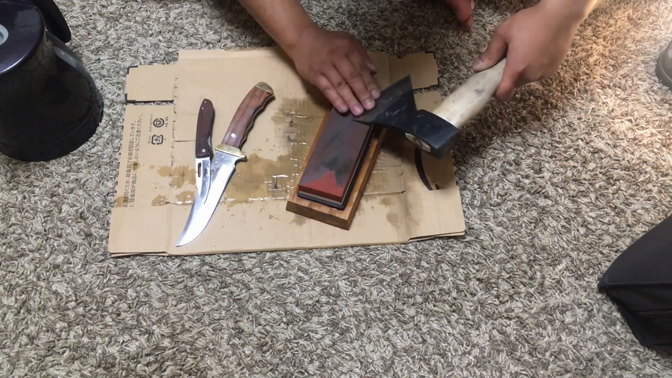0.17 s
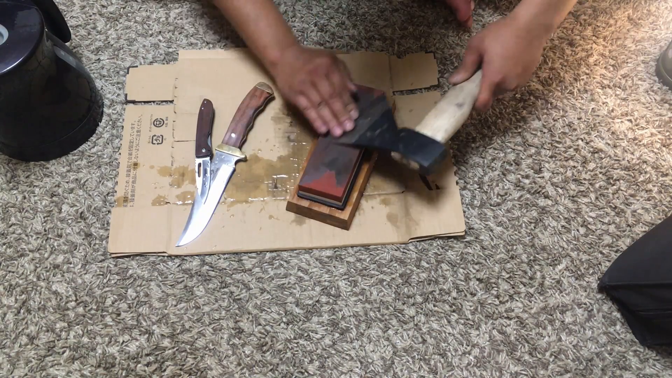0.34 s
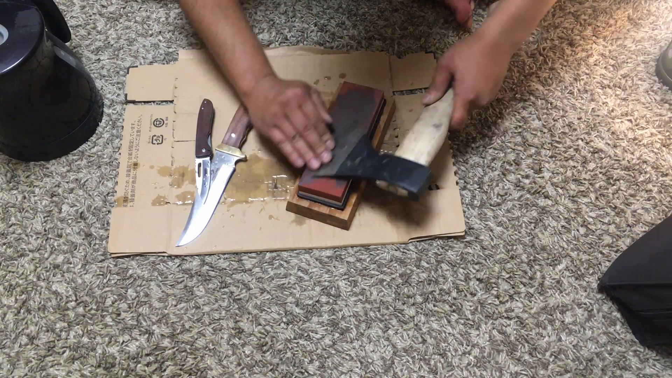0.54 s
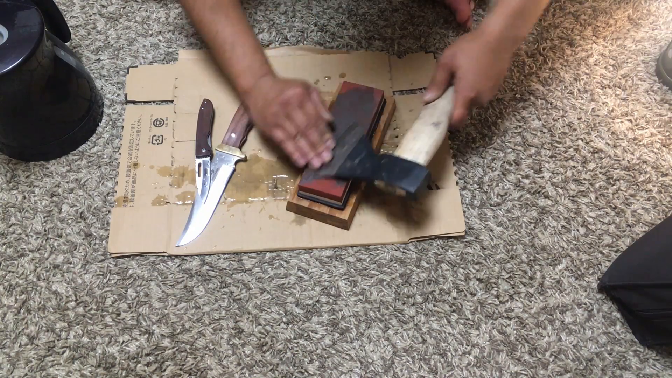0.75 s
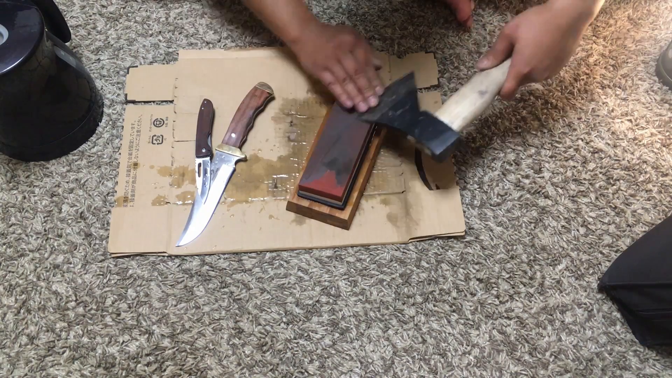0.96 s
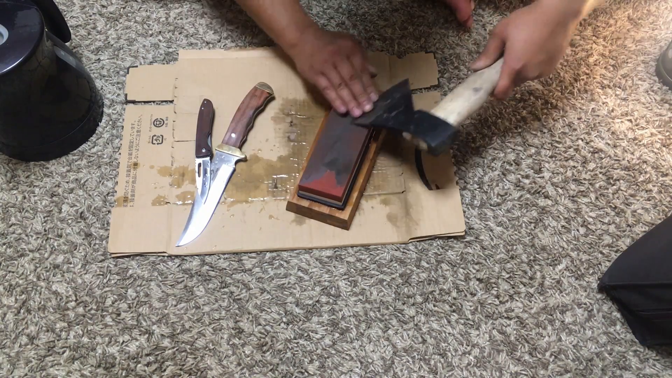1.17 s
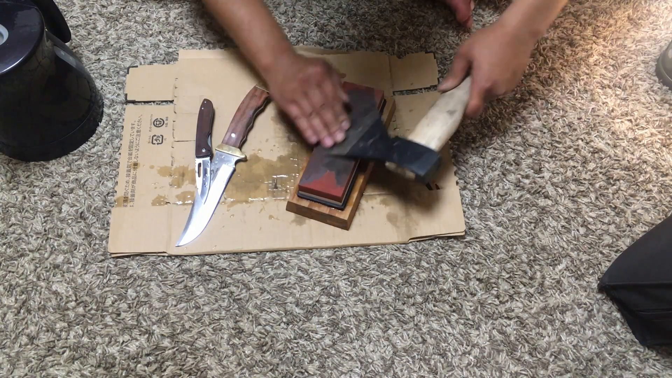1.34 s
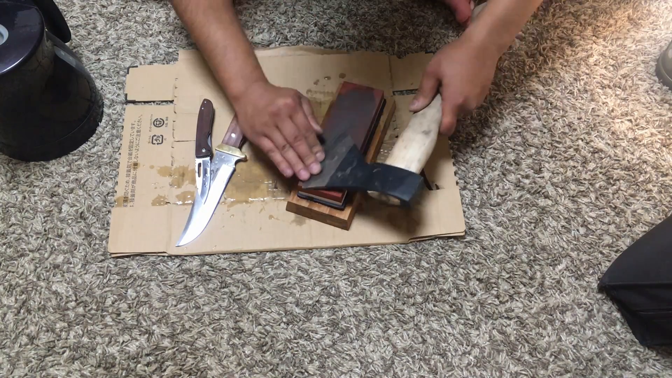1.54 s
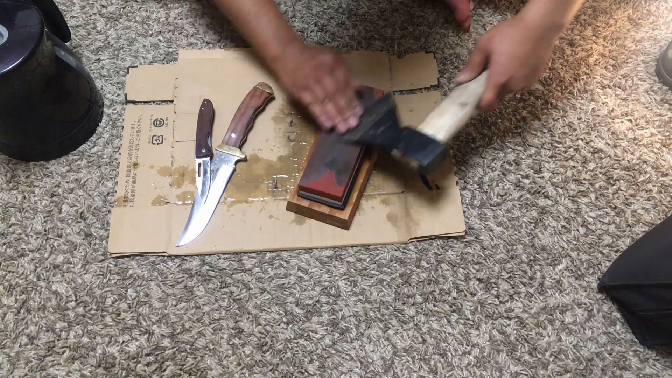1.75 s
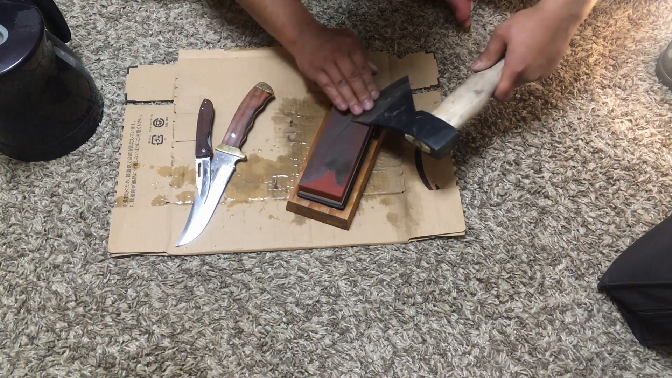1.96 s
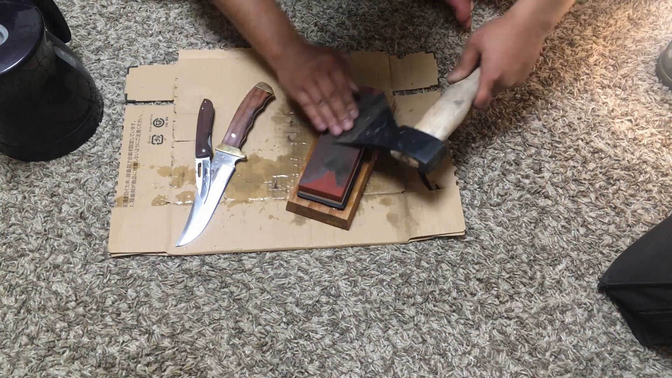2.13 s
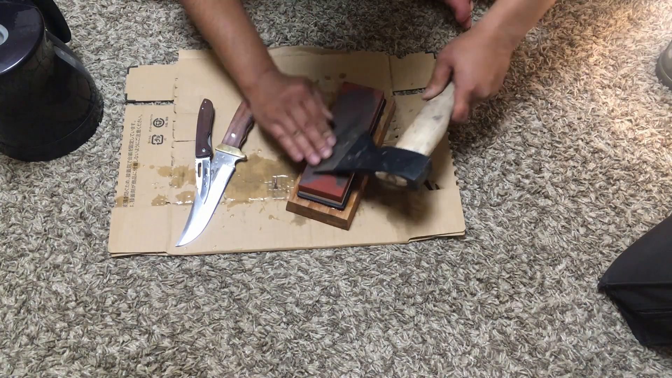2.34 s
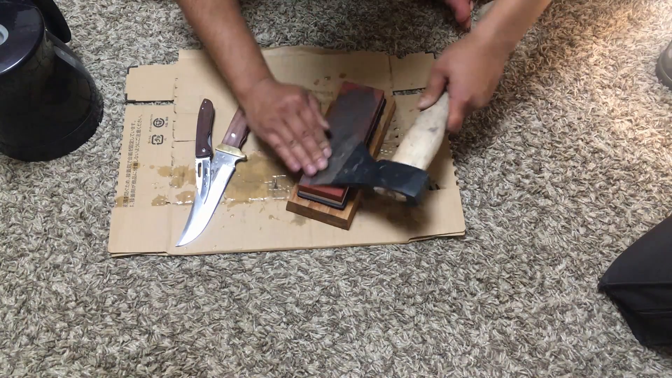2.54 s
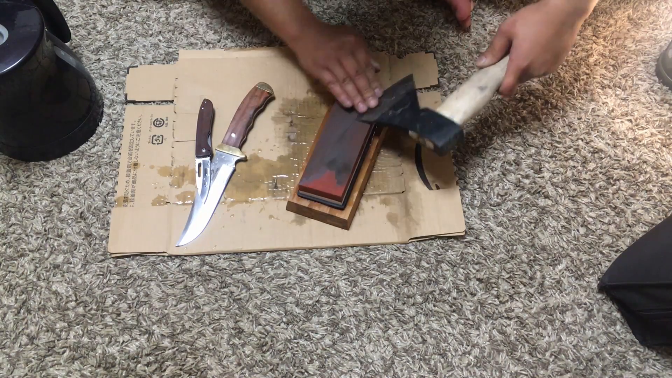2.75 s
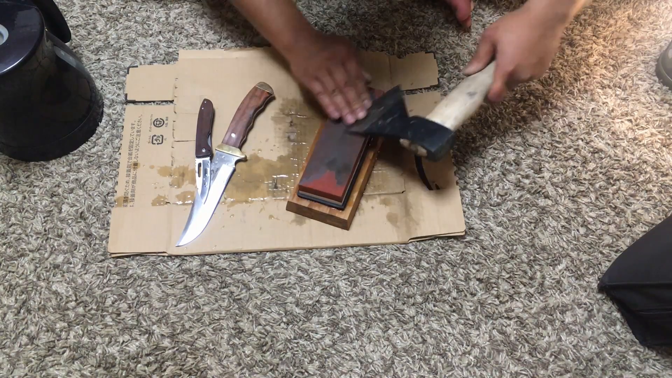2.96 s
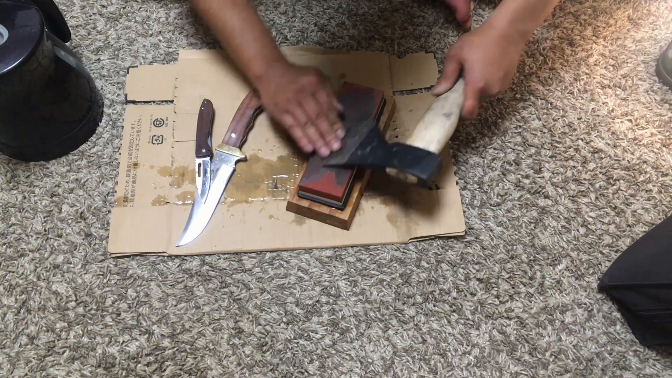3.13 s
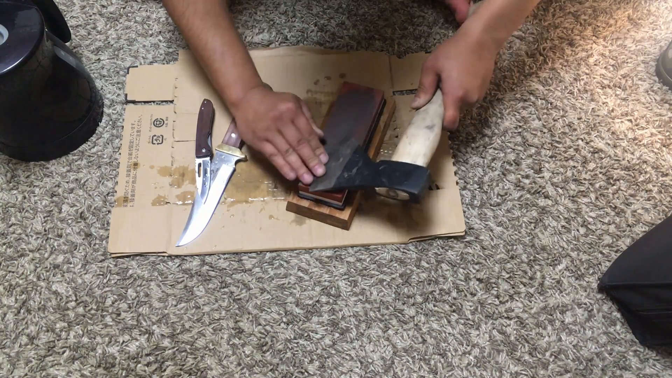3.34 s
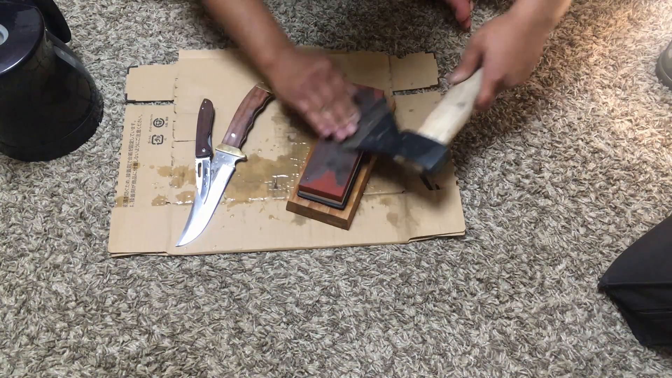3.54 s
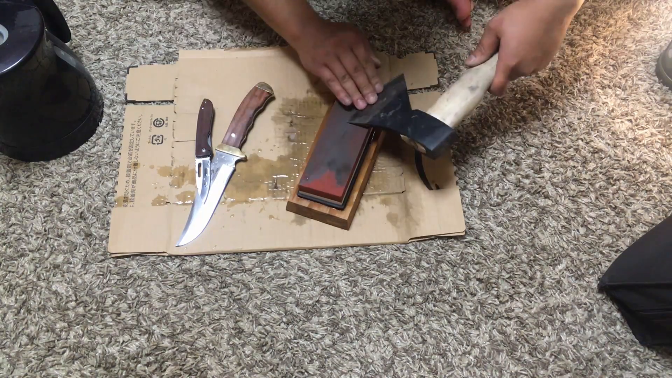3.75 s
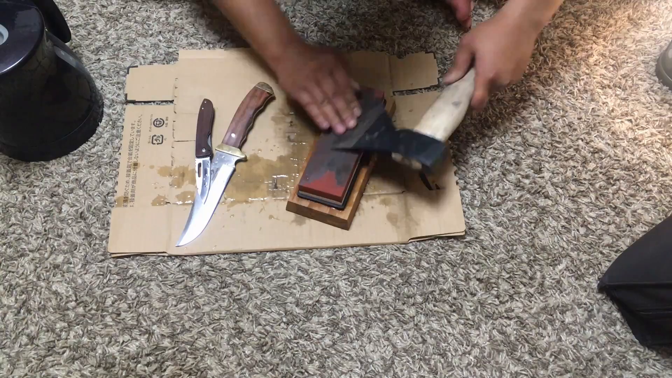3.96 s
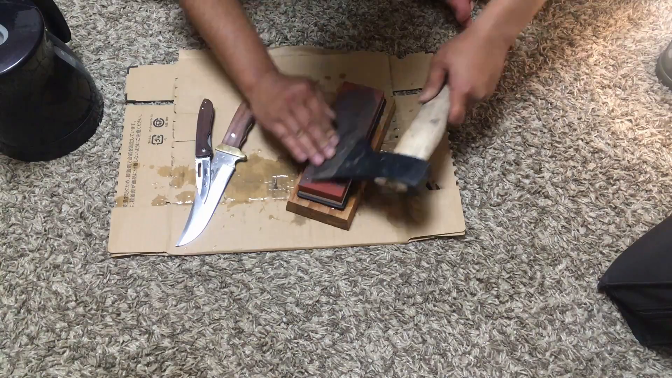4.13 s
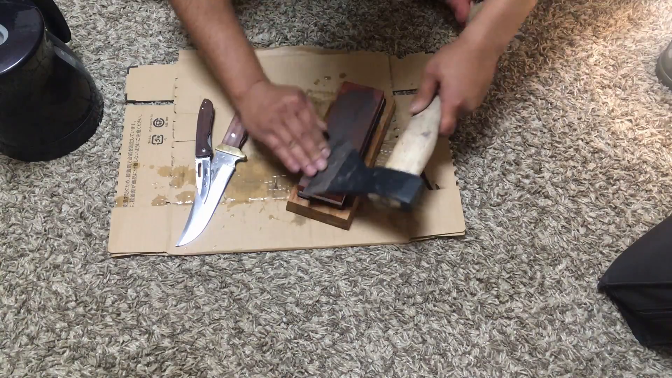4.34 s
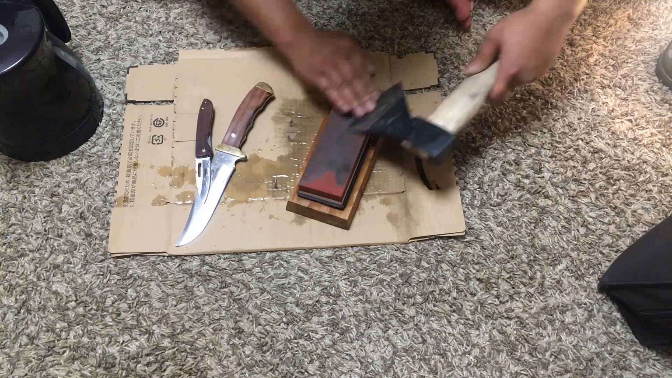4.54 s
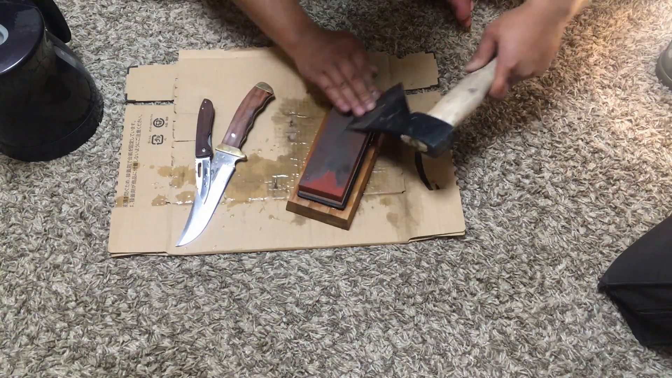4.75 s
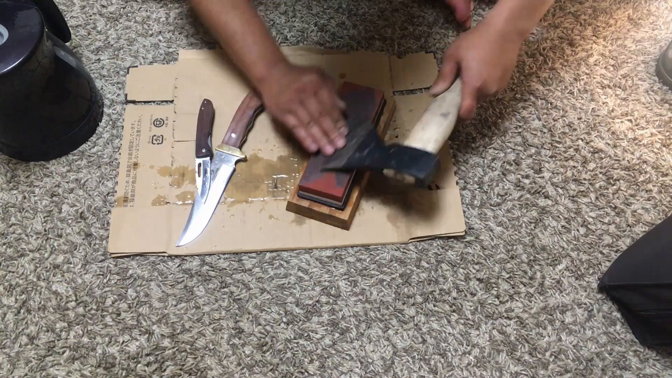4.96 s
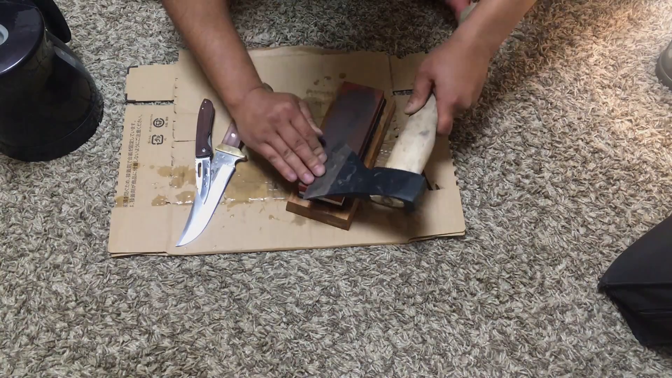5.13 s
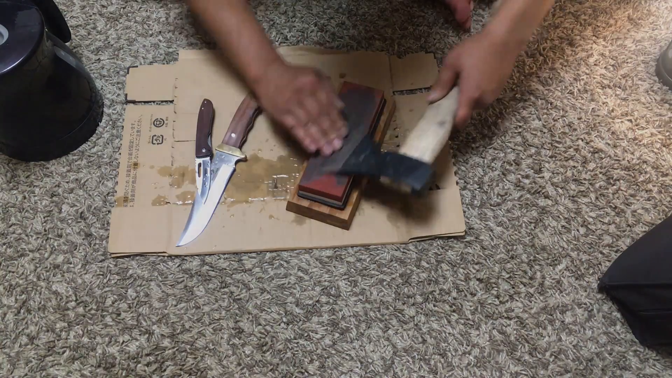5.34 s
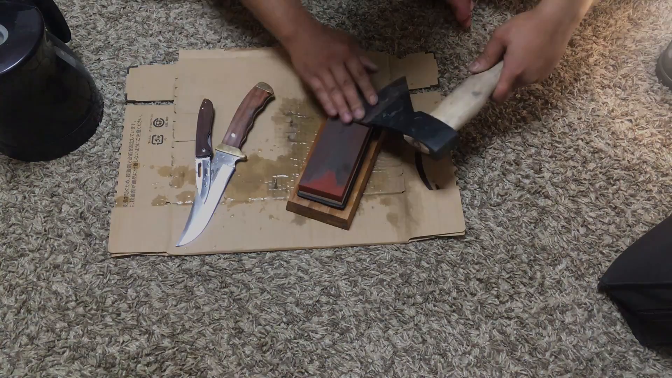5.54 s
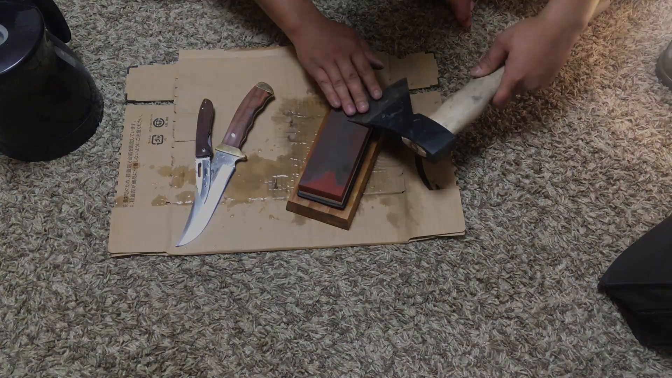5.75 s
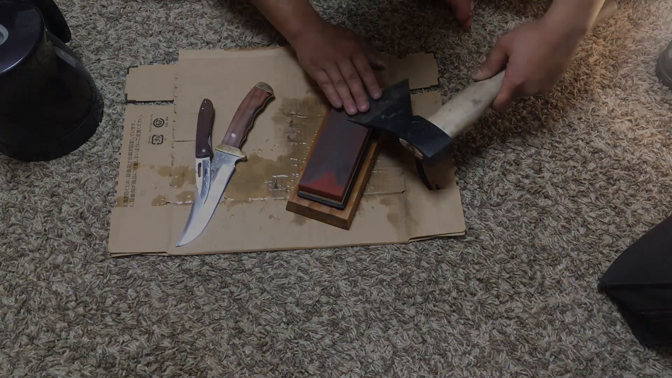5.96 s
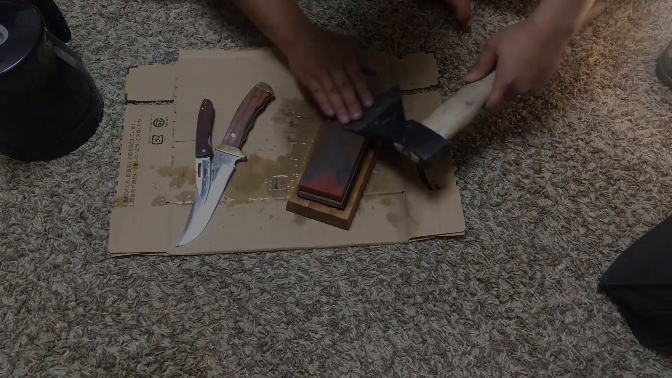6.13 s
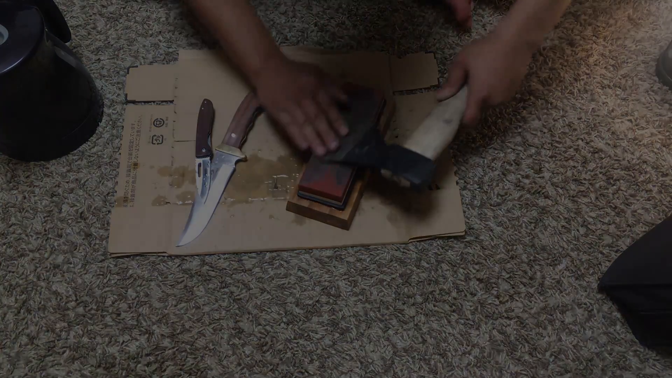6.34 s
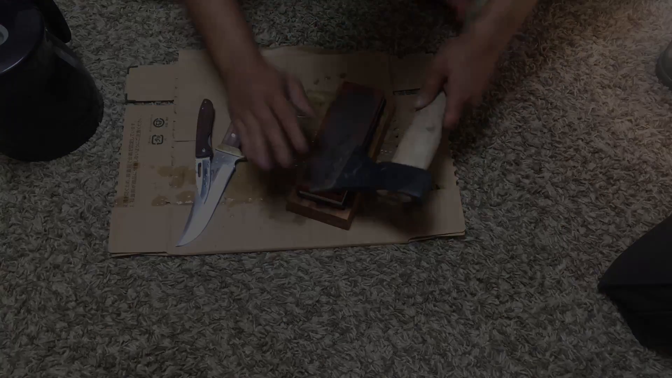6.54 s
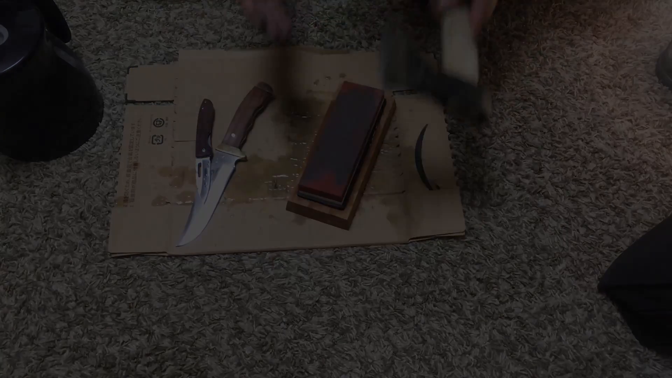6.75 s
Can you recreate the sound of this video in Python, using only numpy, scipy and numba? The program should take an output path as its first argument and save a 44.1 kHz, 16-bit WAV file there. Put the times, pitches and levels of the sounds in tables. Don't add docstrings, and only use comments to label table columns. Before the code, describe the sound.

An axe head rasps to and fro on a wet whetstone in a quiet carpeted room, gritty strokes ending with a lift-off scrape and faint ring.

```python
import sys
import numpy as np
from scipy import signal
from scipy.fft import rfft, irfft
from scipy.io import wavfile
from scipy.ndimage import uniform_filter1d
from numba import njit

SR = 44100
rng = np.random.default_rng(int(sys.argv[2]) if len(sys.argv) > 2 else 0)


def pcm_store(signal):
    levels = np.round(np.clip(np.atleast_2d(signal), -1, 1) * 32767)
    wavfile.write(sys.argv[1], SR, levels.astype(np.int16).T)


def linear_from_db(decibels):
    return 10 ** (np.asarray(decibels, float) / 20)


N = 303849
COARSE = 32

# centre in Hz (0 if sliding), width in Hz, level in dB,
# gain in dB per kHz that the mode rises (standing modes follow the cheek mode).
STONE_MODES = [(0, 126, 6, 25), (1780, 212, 2.5, 2.5), (900, 2000, -2.5, -12)]
CHEEK_MODES = [(0, 264, 4, 18.5), (2778, 116, -1, -13), (3180, 283, 2.5, -11), (3400, 760, -7, 7)]
EDGE_MODES = [(0, 293, -4, 2), (0, 530, -3.5, 1), (0, 364, 3.5, -2), (6835, 200, -12, 3),
              (8063, 190, -10, -10), (9220, 160, -9.5, 7), (11090, 430, -4.5, 5), (7380, 4900, -7, 7)]
BEVEL_MODES = [(0, 580, 1.5, -1.0), (0, 600, -6, 1.0), (0, 600, -6, 0.1), (13900, 660, -3, 0.1),
               (13900, 1900, -10, 0.1)]
# centre in Hz, share of their shift.
PULLED_MODES = [(12900, 0.49), (15100, 0.85)]
# place, stone in Hz, cheek in Hz,
# three edge modes in Hz, bevel in Hz.
PUSH_MODES = [(0, 1145, 3640, 5660, 8180, 9170, 14400), (.55, 1264, 3860, 5570, 8300, 8900, 14150),
              (1.0, 1200, 3914, 5100, 8500, 10030, 15900), (1.35, 1184, 3850, 5490, 7420, 9760, 14450),
              (2.0, 1154, 3360, 5980, 7180, 9140, 14800), (2.3, 1266, 3610, 5890, 7530, 9640, 14300),
              (2.65, 1332, 3960, 5020, 7420, 11230, 14640), (3.1, 1350, 4260, 5530, 7460, 8970, 15600),
              (3.6, 1330, 4050, 5530, 8070, 10040, 15500)]
PULL_MODES = [(0, 1180, 3780, 5890, 7900, 10160, 14700), (.6, 1166, 3520, 5810, 8320, 9780, 14060),
              (1.0, 1100, 3810, 5210, 7920, 9150, 13900), (1.5, 985, 3530, 5410, 7630, 9800, 14550),
              (2.2, 1150, 3400, 5710, 6800, 9230, 14700), (3.0, 1230, 3780, 5730, 7200, 9600, 14100),
              (3.6, 1280, 3997, 5300, 7400, 9800, 15000)]
# place, grip in dB, then stone, cheek
# and bevel in dB re edge.
PUSH_SHARE = [(0, 0, -10, -1.5, 4), (.6, -0.69, -14.5, -6, -2), (1.0, 1.5, -18, -3.5, 3.5),
              (1.4, 0.95, -19, -5.5, 4.5), (1.9, -2.3, -24, -12.5, -6.5), (2.2, -1.3, -16.5, -11.5, -5),
              (2.6, -0.61, -9, -5.5, 5), (3.0, 0.15, -14, -4, -0.5), (3.5, 1.2, -11, -2.5, 2.5)]
PULL_SHARE = [(0, 0.084, -7.5, -1, -3), (.6, 0.62, -20, -9.5, -1.5), (1.0, -0.67, -22, -8, -3),
              (1.4, 0.16, -24.5, -10, 0), (2.0, 0, -17, -9, 2), (2.8, -0.12, -6, -6.5, 1),
              (3.5, 0.27, -5.5, -4, -1)]
# centre in Hz, width in Hz, level in dB.
CANCELLATIONS = [(2180, 1000, 0), (10700, 440, -15), (10510, 360, -22), (12450, 860, -7.5), (5930, 140, 6)]
# share of the way to the next mode, width in Hz, level in dB.
GAPS = [(.55, 900, -1)]
# time in seconds, level in dB.
LIFT_DRAG = [
    (6.47, -36),
    (6.53, 16),
    (6.57, -1),
    (6.585, -37),
]


def rasp():
    grip_db, stone_db, cheek_db, bevel_db = contact(PUSH_SHARE, PULL_SHARE)
    effort_db = stroke_db(grip_db)
    stone_hz, cheek_hz, *edge_hz, bevel_hz = contact(PUSH_MODES, PULL_MODES)
    rise_khz = (cheek_hz - 3700) / 1000
    force = [grit(effort_db, spread_db=1.5) for patch in range(3)]
    judder_db = drift(19.4) + 0.91 * drift(71)

    out = part(EDGE_MODES, edge_hz, rise_khz, force, 1.05 * judder_db)
    out += linear_from_db(stone_db) * part(STONE_MODES, [stone_hz], rise_khz, force, 1.2 * judder_db)
    out += linear_from_db(cheek_db) * part(CHEEK_MODES, [cheek_hz], rise_khz, force, 0.35 * judder_db)
    pulled_hz = [hz + share * (edge - np.mean(edge))
                 for (hz, share), edge in zip(PULLED_MODES, edge_hz[1:])]
    out += linear_from_db(bevel_db) * part(BEVEL_MODES, [bevel_hz, *pulled_hz], rise_khz, force, 1.6 * judder_db)
    out /= np.sqrt(1 + linear_from_db(cheek_db) ** 2 + linear_from_db(bevel_db) ** 2)

    fill_hz = 700
    for hz, width_hz, db in CANCELLATIONS:
        depth = np.clip(np.abs(hz - edge_hz[-1]) / fill_hz, 0, 1) ** 2
        out = cancel(out, hz, width_hz, db * depth)
    for share, width_hz, db in GAPS:
        gap_hz = cheek_hz + share * (edge_hz[0] - cheek_hz)
        out = cancel(out, gap_hz, width_hz, db)
    holder = linear_from_db(-29.0) * resonate(force[0], 358, 53)
    touching = np.arange(N) / SR < LIFT_DRAG[-1][0] + .03
    return linear_from_db(effort_db) * (out + holder) * touching


def part(modes, sliding, cheek_rise_khz, force, judder_db):
    out, power = 0, 0
    sliding = iter(sliding)
    for k, (hz, width_hz, db, db_per_khz) in enumerate(modes):
        centre_hz = hz if hz else next(sliding)
        rise_khz = cheek_rise_khz if hz else (centre_hz - np.mean(centre_hz)) / 1000
        gain = linear_from_db(db + db_per_khz * rise_khz + 3.14 * drift(5.5))
        once = resonate(force[k % len(force)], centre_hz, width_hz)
        out = out + gain * resonate(once, centre_hz, 1.59 * width_hz)
        power = power + gain ** 2
    return linear_from_db(judder_db) * out / np.sqrt(power)


def grit(effort_db, spread_db):
    per_s = np.clip(5000 * linear_from_db(.6 * (effort_db + 46) + 3.0 * drift(40)), 300, 20000)
    sizes = linear_from_db(spread_db * np.minimum(rng.exponential(1, N), 5)) * rng.choice([-1, 1], N)
    snapping = rng.random(N) < per_s / SR
    snaps = rms_one(sizes) * snapping * np.sqrt(SR / per_s)
    slurry = 0.81 * rng.standard_normal(N)
    return rms_one(snaps + slurry)


# start, at place 1, at place 2, at farthest node, stop, all in seconds.
PUSHES = [(.16, .285, .48, .58, .72), (1.12, 1.27, 1.41, 1.51, 1.62), (1.97, 2.10, 2.23, 2.35, 2.53),
          (2.88, 2.99, 3.07, 3.2, 3.385), (3.84, 3.915, 3.98, 4.16, 4.325),
          (4.695, 4.775, 4.89, 5.07, 5.225), (6.06, 6.17, 6.27, 6.43, 6.6)]
# place at farthest node, place at the stop, extra grip over the place-2 belly in dB.
REACH = [(2.45, 2.4, -7), (2.5, 2.42, 0.5), (3.0, 3.5, 1), (3.002, 3.64, -2.5), (3.0, 3.5, 4.5),
         (3.0, 3.7, 5), (3.0, 3.43, 2)]
# at place 2, at place 1, stop, all in seconds.
PULLS = [(.74, .82, 1.09), (1.65, 1.79, 1.965), (2.6, 2.675, 2.875), (3.46, 3.57, 3.77), (4.4, 4.52, 4.69),
         (5.34, 5.49, 5.64)]


def contact(push_rows, pull_rows):
    s, place, pulling = [0], [0.72], [1]
    for push, reach, pull in zip(PUSHES, REACH, [*PULLS, ()]):
        s += [*push, *pull]
        place += [0, 1, 2, *reach[:2], *(2, 1, 0)[:len(pull)]]
        pulling += [0] * 4 + [1] * len(pull) + [0]
    t, s = np.arange(0, N, COARSE) / SR, np.maximum.accumulate(s)
    here = np.interp(t, s, place)
    back = np.array(pulling)[np.searchsorted(s, t, "right") - 1]
    turn_s = 0.024
    back = uniform_filter1d(back.astype(float), size=max(int(turn_s * SR / COARSE), 1))
    sides = []
    for rows in (push_rows, pull_rows):
        rows = np.array(rows, float)
        row = np.interp(here, np.sort(rows[:, 0]), np.arange(len(rows)))
        k = np.minimum(row.astype(int), len(rows) - 2)
        ease = .5 - .5 * np.cos(np.pi * (row - k))
        sides.append(rows[k, 1:].T * (1 - ease) + rows[k + 1, 1:].T * ease)
    return [fill_in(column) for column in sides[0] * (1 - back) + sides[1] * back]


# up to speed in seconds, slowing in seconds, level in dB,
# gain over the stroke in dB, swell at its middle in dB.
STROKES = [(-0.1, 0.096, -40, -1, 8), (0.233, 0.668, -39.5, 5, 3), (0.763, 1.038, -41.5, 7.5, 8.5),
           (1.193, 1.569, -37, 3.5, -1.5), (1.656, 1.908, -38, 0, 8.5), (2.039, 2.488, -40.5, -1, 0),
           (2.583, 2.842, -42, -3, 11), (2.927, 3.33, -39, 1, 0.5), (3.443, 3.72, -42, -4, 9),
           (3.899, 4.285, -38.5, 1.5, -2.5), (4.365, 4.657, -42.5, -0.5, 12), (4.735, 5.173, -39.5, 2, 0),
           (5.269, 5.564, -39, 11.5, 7), (5.646, 5.689, -53, 2.5, 1), (5.835, 5.871, -50.5, 6.5, -1),
           (6.123, 6.535, -42.5, 8.5, 2.5)]
# time in seconds, level held back before it in dB.
BITES = [(0.7394, 13), (1.635, 5), (2.5463, 13), (3.39, 11), (4.339, 18), (4.7064, 5), (5.255, 9),
         (6.0861, 3)]


def stroke_db(grip_db):
    t = np.arange(0, N, COARSE) / SR
    rest_db = -73
    speed_up_s, slow_down_s, knee = 0.052, .045, 1.19
    power = linear_from_db(rest_db) ** 2
    for full_s, slow_s, level_db, gain_db, swell_db in STROKES:
        share = np.clip((t - full_s) / (slow_s - full_s), 0, 1)
        rising = (np.maximum(full_s - t, 0) / speed_up_s) ** knee
        falling = (np.maximum(t - slow_s, 0) / slow_down_s) ** knee
        db = level_db + gain_db * (share - .5) + swell_db * np.sin(np.pi * share)
        power = power + linear_from_db(db - 20 * np.minimum(rising + falling, 10)) ** 2

    bite_db, bite_s, stick_s = 6, .008, 0.0086
    stuck_db = 0
    for s, held_db in BITES:
        held = held_db * np.exp(np.minimum(t - s, 0) / stick_s) * (t < s)
        jolt = bite_db * np.exp(-np.maximum(t - s, 0) / bite_s) * (t >= s)
        stuck_db = stuck_db + held - jolt

    belly_s = .035
    belly_db = sum(reach[2] * np.exp(-((t - push[2]) / belly_s) ** 2)
                   for push, reach in zip(PUSHES, REACH))
    return fill_in(10 * np.log10(power) + belly_db - stuck_db) + grip_db - 6.5


# centre in Hz, level in dB, t60 in seconds.
FREE_MODES = [
    (5098, -81, .16),
    (9200, -79, .3),
    (14220, -73, .2),
]


def lift_off():
    dragging = np.abs(np.arange(N) / SR - LIFT_DRAG[1][0]) < .07
    drag = linear_from_db(in_time(LIFT_DRAG)[0]) * rng.standard_normal(N) * dragging + 1e-18
    out = linear_from_db(-77.0) * resonate(drag, 1900, 2200)
    for hz, db, t60_s in FREE_MODES:
        out = out + linear_from_db(db) * resonate(drag, hz, np.log(1000) / np.pi / t60_s)
    return out


# time in seconds, peak in dB.
TICKS = [(5.898, -48), (5.9294, -62), (5.9748, -60), (6.0038, -61), (6.0132, -55), (6.0287, -52),
         (6.0444, -57), (6.0555, -50.5)]


def ticks():
    modes = [(8950, 0.5, 0.015), (13600, 4, .005), (7900, -24, .005), (14700, -8, .006)]   # Hz, dB, t60 s
    return sum(ring(s, db + gain_db - 5, hz, t60_s) for s, db in TICKS for hz, gain_db, t60_s in modes)


# time in seconds, peak in dB, pitch in Hz, t60 in seconds.
KNOCKS = [(0.917, -49, 300, 0.099), (0.949, -44.5, 298, 0.17), (1.001, -45.5, 325, 0.15),
          (1.769, -39.5, 327, 0.057), (2.753, -50, 303, 0.04), (4.253, -55, 395.7, 0.24),
          (4.905, -47, 820, 0.04), (5.456, -54, 314, 0.074), (5.563, -55.5, 320, 0.11)]


def knocks():
    overtones = [(1, -1, 1), (1.9, -6, 0.27), (3.0, -7, 0.19)]
    return sum(ring(s, db + gain_db, ratio * hz, share * t60_s)
               for s, db, hz, t60_s in KNOCKS for ratio, gain_db, share in overtones)


def room(x):
    t = np.arange(SR // 4) / SR
    tail = rng.standard_normal(len(t)) * linear_from_db(-60 * t / 0.06) * (t > .004)
    return signal.fftconvolve(x, tail / np.sqrt(np.sum(tail ** 2)))[:N]


# frequency in Hz, level in dB per Hz.
HUM_SPECTRUM = [(15, -44), (25, -10), (56, 3.5), (113, -3.5), (146, -1), (173, -6), (244, -0.5),
                (310, -21.5), (338, -28.5), (575, -31), (782, -35), (913, -28.5), (1120, -35), (1500, -35),
                (1950, -43), (3300, -120)]
# time in seconds, rumble in dB, distant whir in dB.
SWELL = [(0.0, -61.5, -61), (0.88, -61, -63), (1.57, -61, -60.5), (2.13, -60.5, -66.5), (3.55, -57, -66),
         (3.76, -59.5, -67), (5.56, -60, -68.5), (5.93, -63, -72.5), (6.41, -56, -68), (6.89, -62.5, -71)]
# centre in Hz, width in Hz, level in dB.
DUCTS = [
    (59.6, 43, -74),
    (245.7, 18, -64.5),
    (302.7, 1.28, -66),
]
# time in seconds, level in dB.
AIR = [(0, -66), (5.7, -68), (6.0, -73), (6.6, -66), (6.65, -67.5), (6.74, -61), (6.89, -61)]


def room_tone():
    hz = np.maximum(np.fft.rfftfreq(N, 1 / SR), 1)
    shape_hz, shape_db = np.transpose(HUM_SPECTRUM)
    shape = linear_from_db(np.interp(np.log(hz), np.log(shape_hz), shape_db))
    noise = rfft(rng.standard_normal(N)) * shape
    rumble_db, whir_db = in_time(SWELL)
    rumble = linear_from_db(rumble_db + 0.5) * rms_one(irfft(noise * (hz < 110), N))
    hum = linear_from_db(-61.5) * rms_one(irfft(noise * (hz >= 110) * (hz < 380), N))
    whir = linear_from_db(whir_db - 5) * rms_one(irfft(noise * (hz >= 380), N))
    tones = sum(linear_from_db(db) * resonate(rng.standard_normal(N), tone_hz, width_hz)
                for tone_hz, width_hz, db in DUCTS)
    highpass = signal.butter(1, 1200, "high", fs=SR, output="sos")
    hiss = signal.sosfilt(highpass, rng.standard_normal(N))
    air = linear_from_db(in_time(AIR)[0]) * cancel(hiss, hz=5000, width_hz=3200, db=-6.5)
    return rumble + hum + whir + tones + air


def rms_one(x):
    return x / np.sqrt(np.mean(x ** 2) + 1e-20)


def in_time(rows):
    s, *columns = np.transpose(rows)
    return [np.interp(np.arange(N) / SR, s, c) for c in columns]


def fill_in(coarse):
    return np.interp(np.arange(N) / COARSE, np.arange(len(coarse)), coarse)


def drift(rate_hz):
    r = np.exp(-2 * np.pi * rate_hz / SR)
    return rms_one(signal.lfilter([1], [1, -2 * r, r * r], rng.standard_normal(N + SR))[SR:])


@njit
def glide(x, cosine, r):
    y = np.zeros(len(x))
    for i in range(2, len(x)):
        y[i] = x[i] - x[i - 2] + 2 * r * cosine[i] * y[i - 1] - r * r * y[i - 2]
    return y


def resonate(x, hz, width_hz):
    cosine = np.cos(2 * np.pi * hz / SR) * np.ones(N)
    return rms_one(glide(x, cosine, np.exp(-np.pi * abs(width_hz) / SR)))


def cancel(x, hz, width_hz, db):
    r = np.exp(-np.pi * abs(width_hz) / SR)
    cosine = np.cos(2 * np.pi * hz / SR) * np.ones(N)
    band = (1 - r * r) / 2 * glide(x, cosine, r)
    return x - (1 - linear_from_db(np.minimum(db, 0))) * band


def ring(at_s, db, hz, t60_s):
    out, first, t60_s = np.zeros(N), int(at_s * SR), max(t60_s, .002)
    t = np.arange(min(int(2 * t60_s * SR), N - first)) / SR
    out[first:first + len(t)] = linear_from_db(db - 60 * t / t60_s) * np.sin(2 * np.pi * hz * t)
    return out


def scene():
    blade = rasp() + lift_off() + ticks() + knocks()
    left = linear_from_db(5.5) * (blade + linear_from_db(-8.5) * room(blade) + room_tone())
    return np.array([left, np.zeros(N)])


def band_limit(x):
    return signal.sosfilt(signal.butter(12, 16380, fs=SR, output="sos"), x)


def record(dry):
    rumble_cut = signal.butter(6, 38, "high", fs=SR, output="sos")
    top_cut = signal.ellip(12, 1, 80, 15750, fs=SR, output="sos")
    mix = signal.sosfilt(top_cut, signal.sosfilt(rumble_cut, dry))
    return band_limit(mix)


dry = scene()
out = record(dry)
pcm_store(out)
```